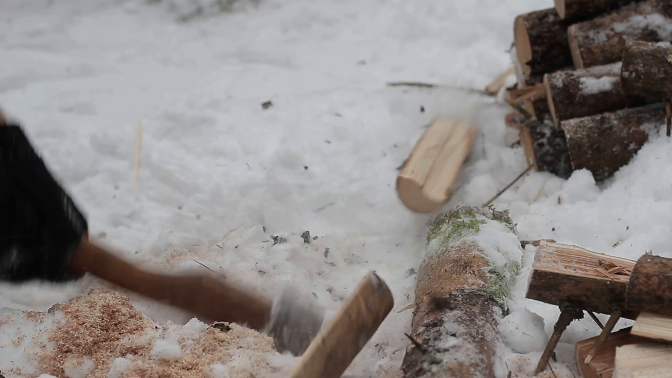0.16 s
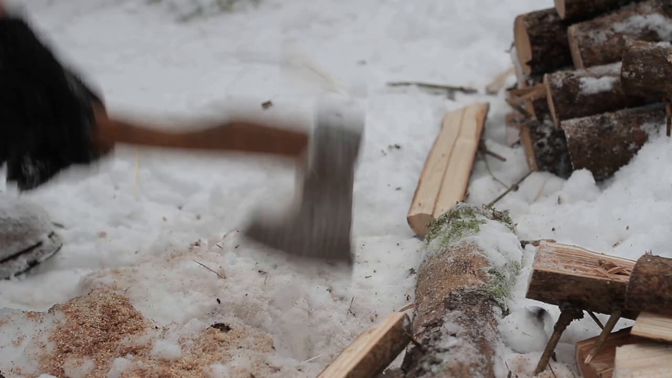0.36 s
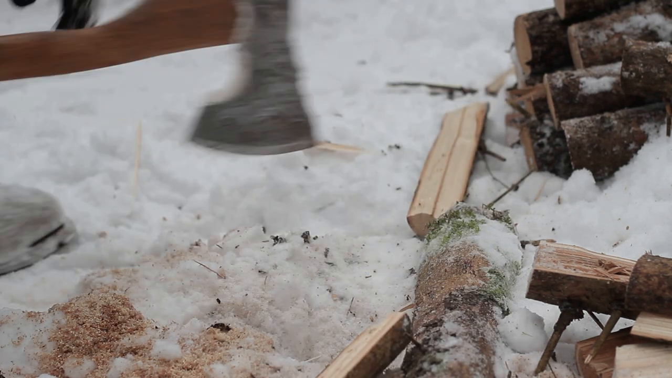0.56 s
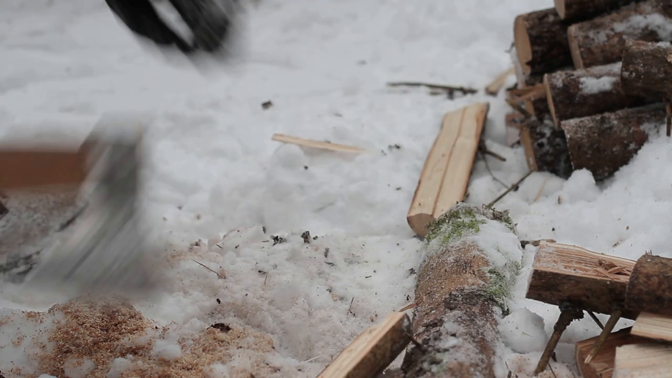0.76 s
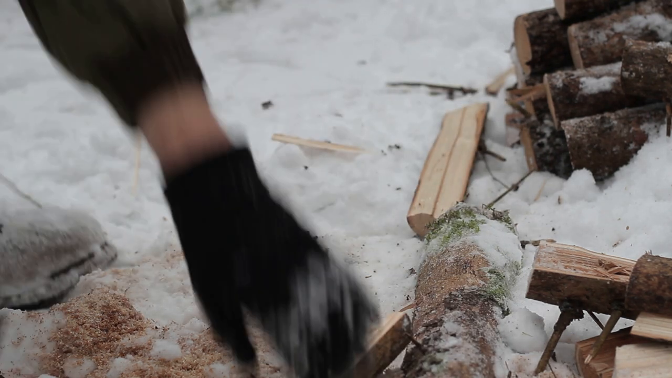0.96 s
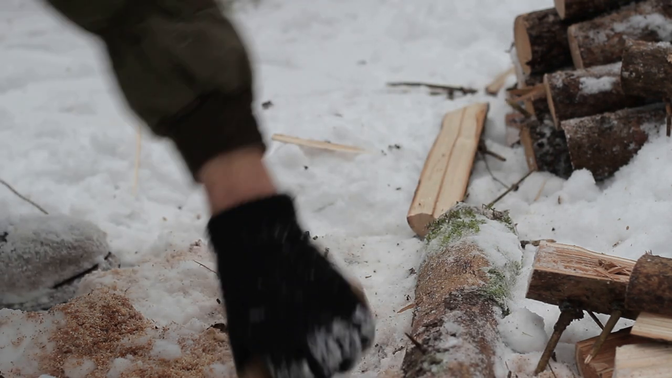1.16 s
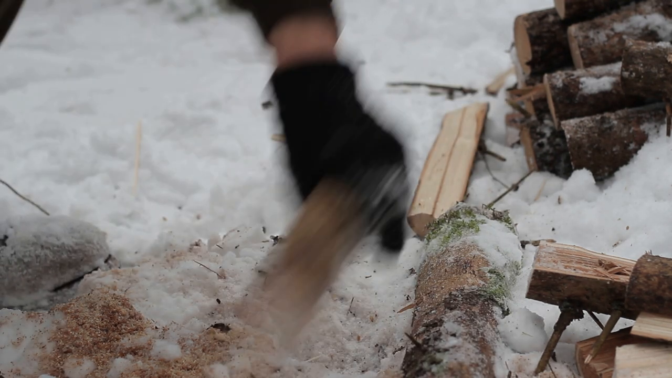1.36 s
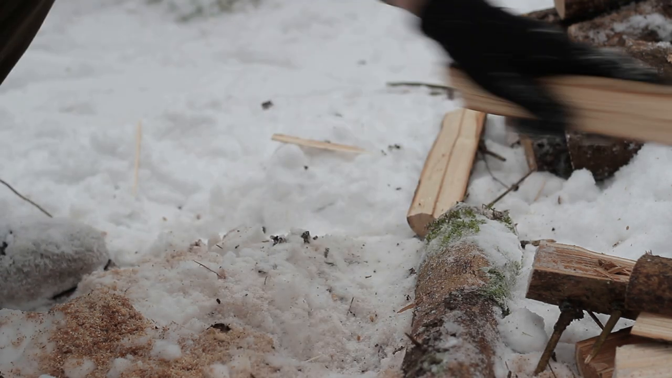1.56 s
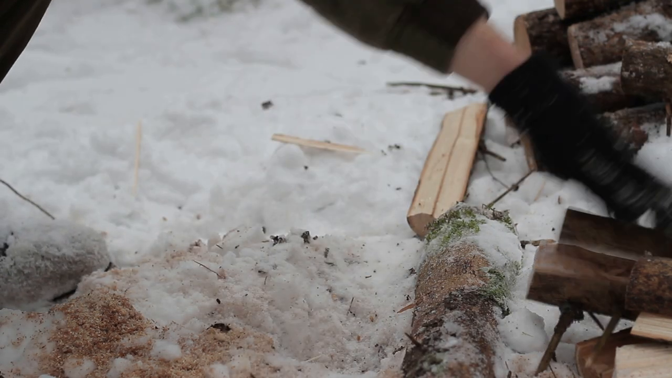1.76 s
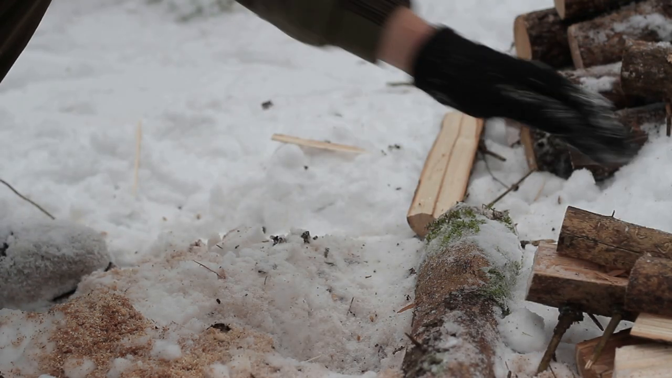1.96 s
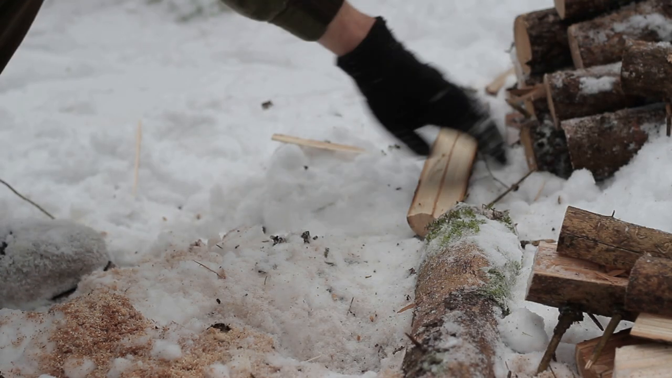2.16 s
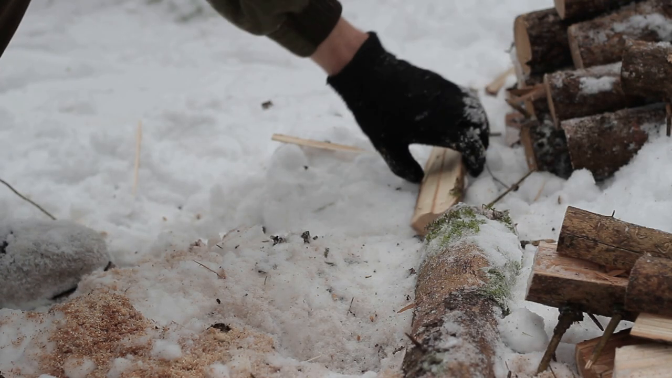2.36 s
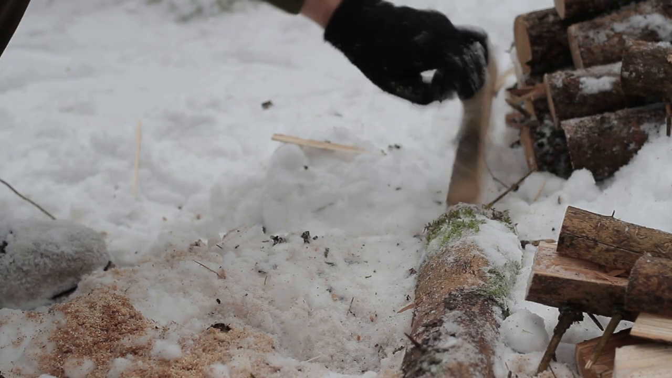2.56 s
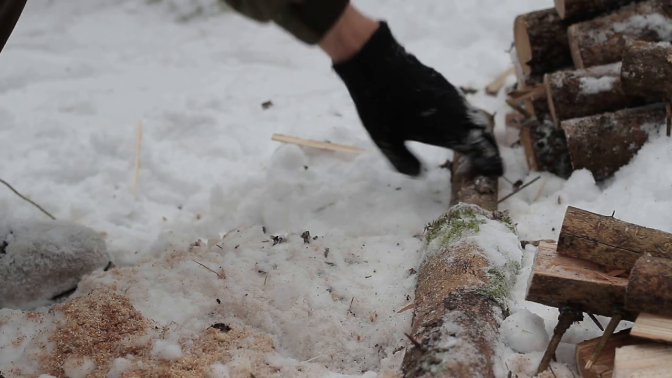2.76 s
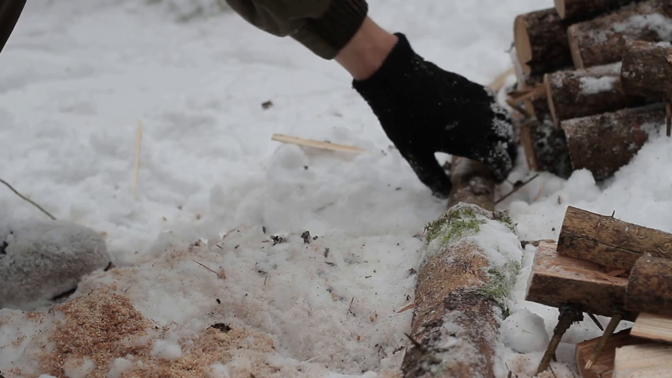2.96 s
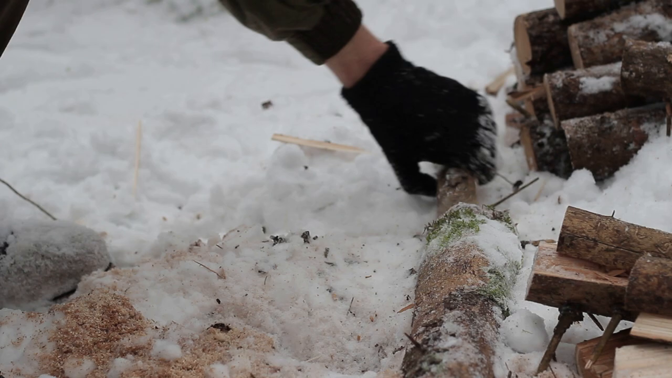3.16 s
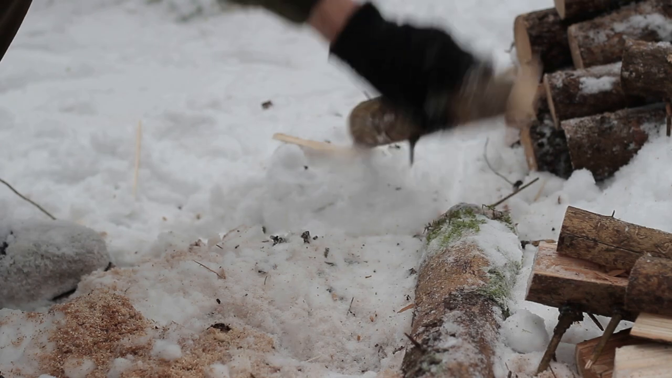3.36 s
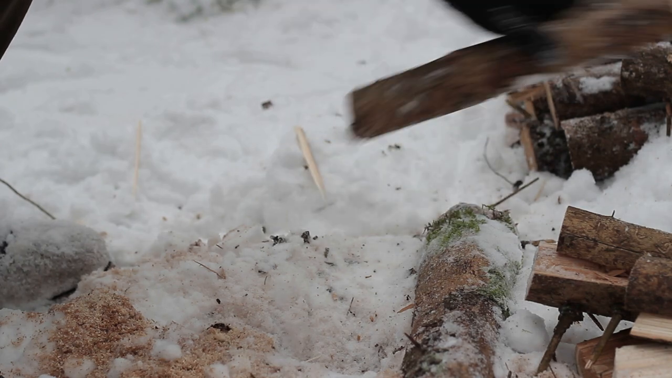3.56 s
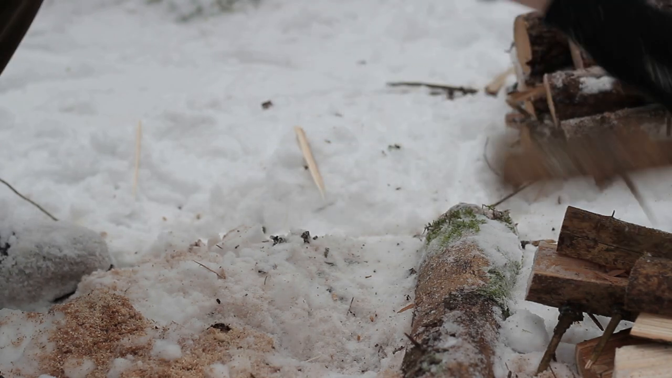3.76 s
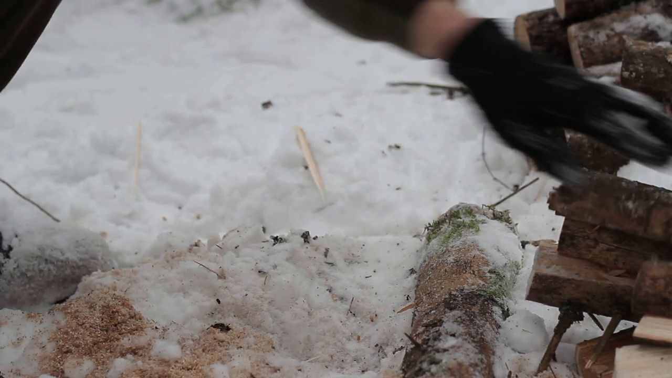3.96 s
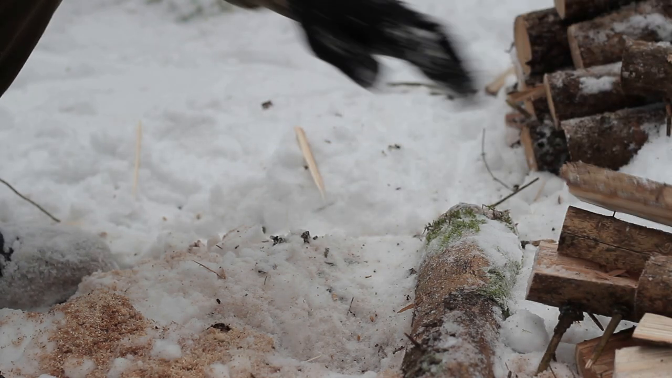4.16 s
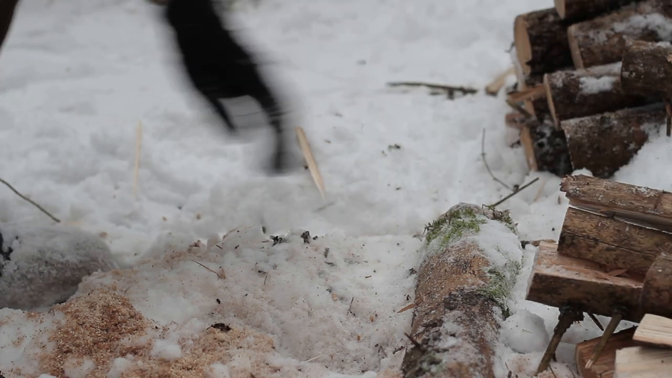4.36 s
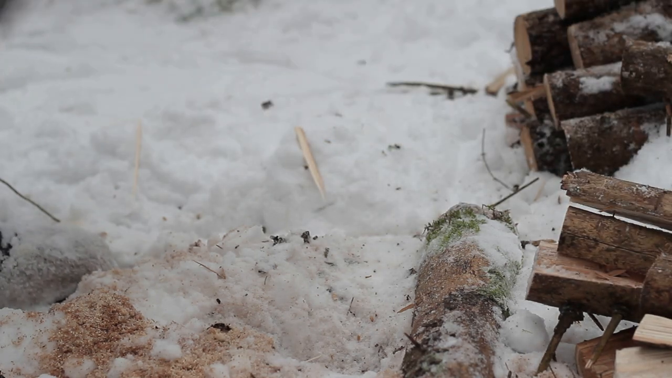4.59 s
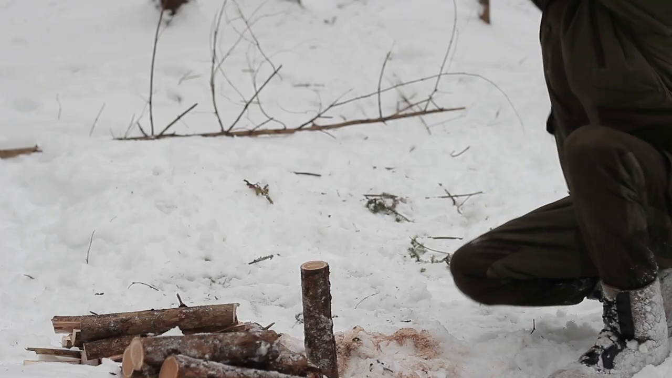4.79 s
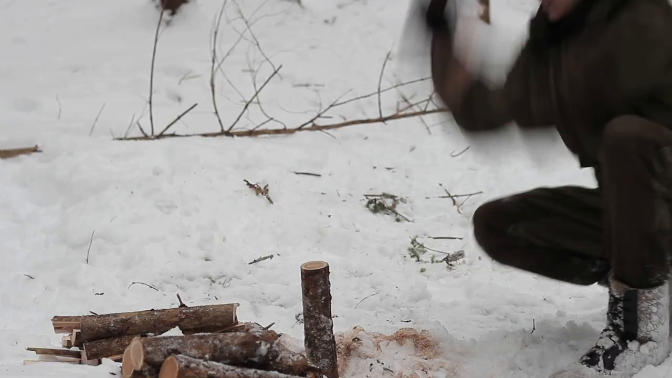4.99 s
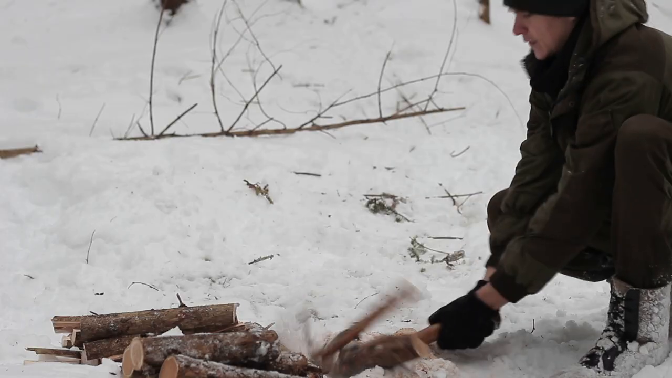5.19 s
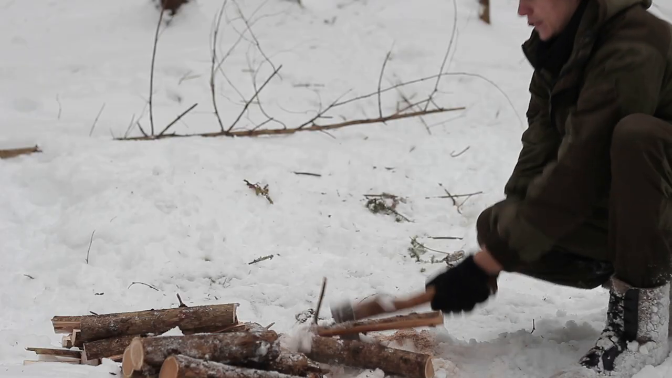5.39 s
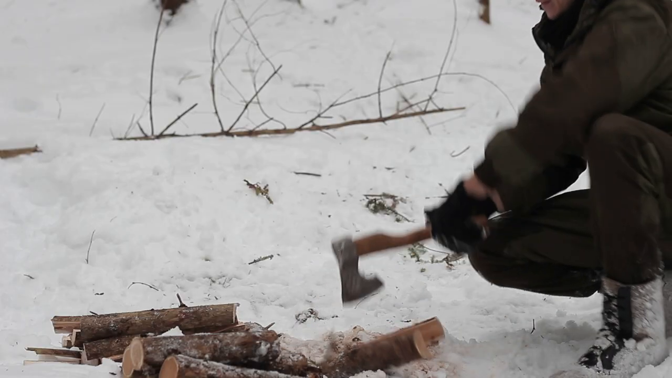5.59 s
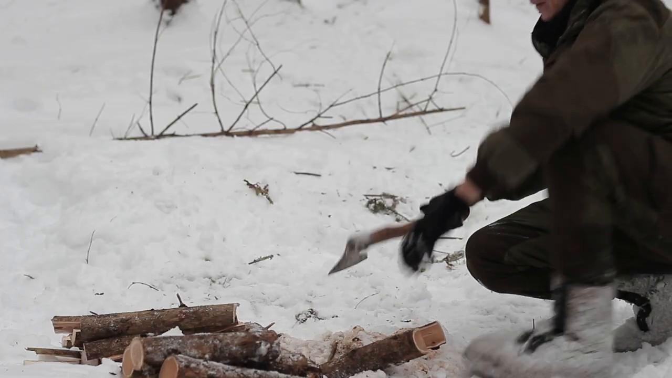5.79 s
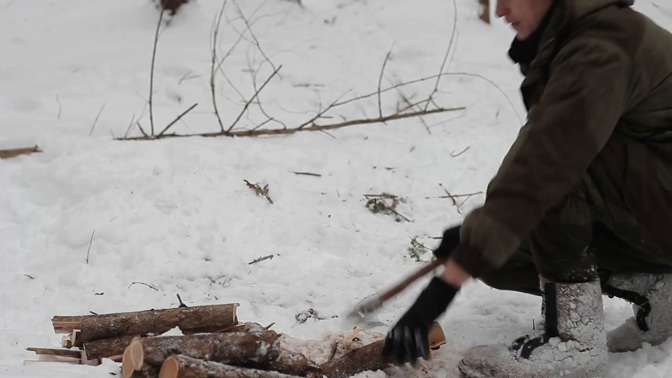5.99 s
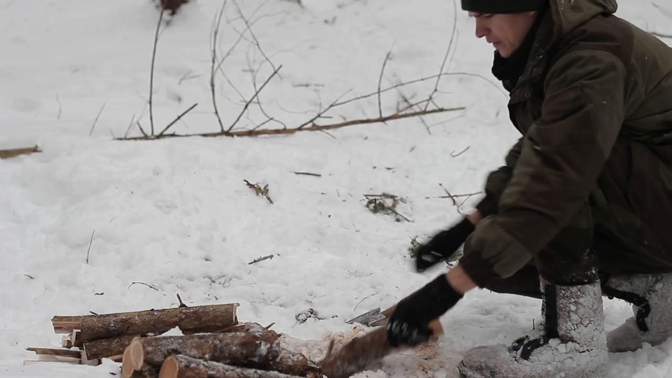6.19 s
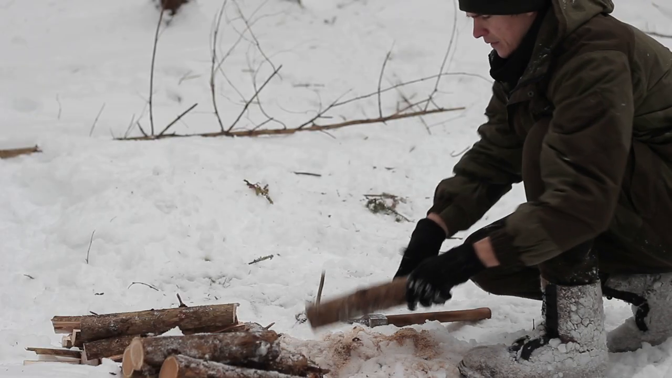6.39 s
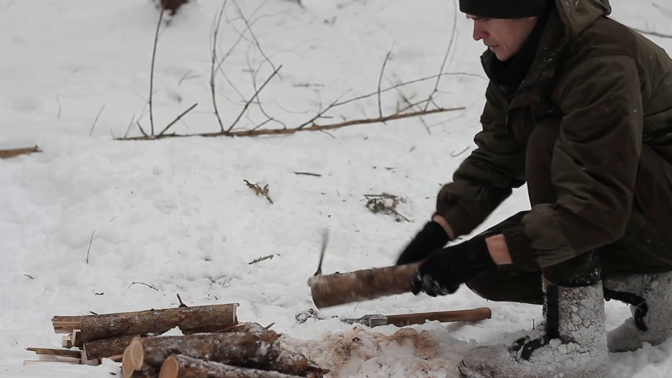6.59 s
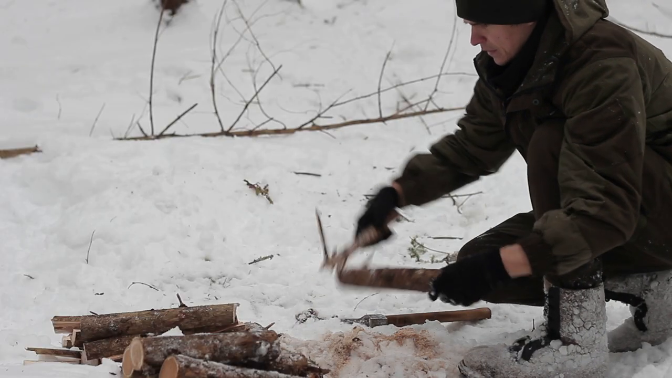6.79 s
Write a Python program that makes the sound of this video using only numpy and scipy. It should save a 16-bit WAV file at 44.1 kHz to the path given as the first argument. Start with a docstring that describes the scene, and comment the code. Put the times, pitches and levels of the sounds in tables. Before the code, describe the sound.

Sharp overloaded wood-splitting crack, faint glove rustle and ticks, two hollow log clacks, then another crack from farther back, with a short forest echo.

```python
"""A hatchet splits a small log almost at once, and another after 5 s, heard from farther off after a cut at 4.7 s,
in a snowy forest: each split is a volley of tearing fibres (resonant noise bursts) that shakes log and steel,
overloads the input and echoes off the trunks. Between the blows split logs knock on a pile (decaying modes),
gloves, bark and snow tick (noise bursts) and thud (low decaying sines), bark scrapes and splinters ping (slip noise
through resonances), and sleeves rustle over the murmur of the woods (filtered noise)."""
import sys
import numpy as np
from scipy import signal
from scipy.io import wavfile

SR = 44100
rng = np.random.default_rng(int(sys.argv[2]) if len(sys.argv) > 2 else 0)


def bounce(signal):
    """Save signal as a 16-bit WAV file at the path given by the first command-line argument."""
    frames = np.transpose(np.atleast_2d(signal))
    limited = np.clip(frames, -1, 1)
    pcm = np.round(limited * 32767).astype(np.int16)
    wavfile.write(sys.argv[1], SR, pcm)


N = 301644

# times the blade lands: [s]
BLOWS_S = [.032, 5.138]
# modes of a short dry log, the second its main ring: pitch_hz, level_db (relative), t60_s (before damping)
LOG_MODES = [(439, -8, 0.04), (990, -0.5, 0.1), (1310, -11, .04), (1430, -1.5, .045), (1710, -4.5, 0.069),
             (2020, -7.5, 0.059), (2230, -10, .035), (3250, -20.5, 0.06), (4080, -21, 0.027),
             (5630, -21.5, .015)]


def from_db(db):
    """Decibels to amplitude gain."""
    return 10 ** (np.asarray(db) / 20)


def rms_one(x):
    """Scales to rms 1."""
    return x / np.sqrt(np.mean(x ** 2) + 1e-20)


def at_hz(points, hz, axis=1):
    """A table column read on a log-frequency axis."""
    points = np.array(points)
    return np.interp(np.log(hz), np.log(points[:, 0]), points[:, axis])


def in_time(rows):
    """A level curve in dB as a gain at every sample."""
    s, db = np.transpose(rows)
    return from_db(np.interp(np.arange(N) / SR, s, db))


def drift(rate_hz):
    """Slow random curve of rms 1: noise through a two-pole lowpass, run at SR / 40."""
    r = np.exp(-80 * np.pi * rate_hz / SR)
    white = rng.standard_normal(N // 40 + 2002)
    slow = signal.lfilter([1], [1, -2 * r, r * r], white)[2000:]  # settled part
    return np.interp(np.arange(N) / 40, np.arange(len(slow)), rms_one(slow))


def bandpass(x, low_hz, high_hz):
    """Butterworth band-pass."""
    return signal.sosfilt(signal.butter(2, [low_hz, high_hz], "band", fs=SR, output="sos"), x)


def bands(white):
    """Half-octave slices of two noises dealt in turn, with their centres."""
    edges_hz = 30 * 2 ** np.arange(0, 9.6, .5)
    for k, (low, high) in enumerate(zip(edges_hz, edges_hz[1:])):
        yield np.sqrt(low * high), bandpass(white[k % 2], low, high)


def coloured(spectrum, white, patchy_db):
    """Noise with a spectrum, each band flickering partly on its own; rms 1."""
    together = drift(17.0)
    total = np.zeros(N)
    for hz, band in bands(white):
        flicker_db = patchy_db * (1.4 * together + drift(5.0))
        total += from_db(at_hz(spectrum, hz) + flicker_db) * band
    return rms_one(total)


def resonate(x, hz, width_hz):
    """One two-pole resonance, gain about 1 on top."""
    r = np.exp(-np.pi * width_hz / SR)
    zeros = np.array([1, 0, -1]) * (1 - r * r) / 2
    poles = [1, -2 * r * np.cos(2 * np.pi * hz / SR), r * r]
    return signal.lfilter(zeros, poles, x)


def add(track, s, sound):
    """Mixes a short sound in at time s."""
    i = round(s * SR)
    track[i:i + len(sound)] += sound[:len(track) - i]


def burst(fade_s, hz, sharpness, treble_db, rise_s):
    """A fading noise burst: a resonant body of peak 1 plus a bright edge."""
    t = np.arange(3000) / SR
    envelope = (1 - np.exp(-t / rise_s)) * np.exp(-t / max(fade_s, 2e-4))
    spray = rng.standard_normal((2, len(t))) * envelope
    width_hz = hz / np.clip(sharpness, .3, 30)
    body = resonate(spray[0], hz, width_hz)
    body = resonate(body, hz, 3.9 * width_hz)  # steepens the skirts
    edge = bandpass(spray[1], 4500, 16000)
    return body / np.abs(body).max() + from_db(treble_db) * edge / np.abs(edge).max()


def scatter():
    """Chips and snow spraying: a gain that starts at each blow and dies away."""
    # one start level per blow: [dB]
    scatter_db = [-42, -40.5]
    fade_db_per_s = 90
    t = np.arange(N) / SR
    return sum((t > s) * from_db(db - fade_db_per_s * np.abs(t - s)) for s, db in zip(BLOWS_S, scatter_db))


def background():
    """Murmur and self-noise are smooth noise; cloth and flying chips come in fine grains."""
    # relative spectra of the woods, the sleeves with the chips, and the self-noise: pitch_hz, level_db
    murmur_spectrum = [(24, -56), (40, -25.5), (166, -4.5), (519, 4), (1080, 4.5), (1310, -5), (2830, -10),
                       (3430, -8.5), (4000, -12), (5200, -41), (8800, -120)]
    rustle_spectrum = [(710, -31), (1200, -2.5), (1430, 6.5), (2040, -4.5), (3320, -1), (5900, -5),
                       (15200, -27.5), (16000, -15)]
    hiss_spectrum = [(18, -54), (30, -23), (158, -18.5), (190, -8), (506, -3), (1840, -15), (2400, -5.5),
                     (3210, -16.5), (15200, -18.5), (16500, -21)]
    # murmur level, which drops at the cut to a second, farther viewpoint at 4.7 s: time_s, level_db
    murmur_level = [(0, -50), (.4, -56.5), (.7, -52), (1.2, -56), (3.6, -59), (4.05, -54.5), (4.66, -58),
                    (4.71, -70.5), (5.0, -66), (5.5, -62), (6.84, -71)]
    # sleeve rustle level: time_s, level_db
    rustle_level = [(0, -55.5), (.28, -61.5), (.53, -54.5), (1.18, -57), (1.64, -60), (2.0, -57.5),
                    (2.2, -62), (3.07, -64), (3.29, -54.5), (3.54, -63.5), (4.04, -54.5), (4.5, -51.5),
                    (4.69, -61), (4.95, -69), (5.12, -61), (5.6, -59), (6.13, -65), (6.84, -65.5)]
    hiss_db = -63.5
    grains = rng.standard_normal((2, N)) * from_db(2.4 * np.minimum(rng.exponential(1, N), 6))
    murmur = coloured(murmur_spectrum, rng.standard_normal((2, N)), patchy_db=.6)
    rustle = coloured(rustle_spectrum, grains, patchy_db=1.4)
    hiss = coloured(hiss_spectrum, rng.standard_normal((2, N)), patchy_db=.7)
    cloth_and_chips = (in_time(rustle_level) + scatter()) * rustle
    return in_time(murmur_level) * murmur + cloth_and_chips + from_db(hiss_db) * hiss


def ticks():
    """Small dry contacts as noise bursts: the clear ones, then faint ones at random."""
    # bark, splinters, ice crust and gloves: start_s, level_db, colour_hz
    clear = [(.015, -46, 6350), (0.148, -33, 5440), (.183, -39, 5500), (0.303, -34, 2200),
             (0.4661, -25.5, 8400), (0.481, -30.5, 5000), (.512, -40, 1660), (.548, -34.5, 2600),
             (1.02, -42, 940), (1.132, -37, 1660), (1.209, -44, 2140), (1.283, -38.5, 3230),
             (1.706, -42, 6030), (1.988, -36.5, 1240), (2.066, -34.5, 3260), (2.126, -19, 12100),
             (2.125, -27.5, 2650), (2.477, -34.5, 5000), (2.651, -45.5, 6030), (2.706, -39, 2270),
             (2.744, -31.5, 7380), (3.045, -44.5, 4000), (3.162, -42.5, 2350), (3.240, -41, 2300),
             (3.266, -46, 2350), (3.296, -37.5, 2450), (3.342, -43, 5000), (3.418, -30.5, 8500),
             (3.510, -37, 7560), (3.631, -47.5, 1353), (3.753, -43.5, 4270), (3.787, -43, 6700),
             (3.867, -28, 5540), (3.872, -30, 4600), (3.886, -34, 8600), (3.905, -25, 5200),
             (3.92, -33, 5340), (3.939, -29.5, 3900), (3.951, -37.5, 5600), (3.971, -41, 8000),
             (4.030, -45, 10100), (4.198, -21, 4850), (4.2373, -26.5, 5460), (4.344, -38, 4630),
             (4.5202, -31.5, 5130), (5.352, -31.5, 3100), (5.441, -43.5, 7900), (5.517, -30, 3300),
             (5.525, -36, 4470), (5.695, -42.5, 1780), (5.909, -47, 8015), (6.122, -35, 3400),
             (6.18, -45.5, 1953), (6.376, -38.5, 1978), (6.514, -44.5, 3730), (6.527, -41, 5400),
             (6.544, -36, 6350), (6.560, -35.5, 8750), (6.644, -44, 3270)]
    faint_count, faint_floor_db = 14, -52.5
    fade_s, fade_at_hz, treble_db = .002, 2500, -17
    sharp_hz, sharpest = 9100, 3  # sharpness is sharp_hz over the colour, capped
    out = np.zeros(N)
    chance = rng.random((faint_count, 3))
    faint = [(N / SR * a, faint_floor_db + 6 * b, 1500 * 2 ** (2.2 * c)) for a, b, c in chance]
    for s, level_db, hz in clear + faint:
        this_fade_s = fade_s * np.sqrt(fade_at_hz / hz)  # brighter is shorter
        sharpness = min(sharp_hz / hz, sharpest)
        add(out, s, from_db(level_db) * burst(this_fade_s, hz, sharpness, treble_db, rise_s=0.0004))
    return out


def tears():
    """Fibres tearing as the blade goes through: coloured bursts, shorter as the split runs on."""
    # start_s, level_db, colour_hz
    fibres = [(.032, 10, 1502), (.036, -5.5, 487), (.038, 3.5, 1180), (0.044, 0, 2094), (0.05, -3, 2800),
              (0.057, -9, 3860), (.059, 2.5, 1770), (.063, -5, 890), (0.0671, -1, 1200), (.068, -5.5, 415),
              (0.072, -5, 893), (.074, -6.5, 1640), (0.079, -6.5, 895), (5.138, 3, 1507),
              (5.139, -6.5, 768), (5.141, -4.5, 3300), (5.144, -3, 2003), (5.147, -0.5, 1870),
              (5.150, -12, 398), (5.153, 3, 2050), (5.16, -1, 1700), (5.164, -13, 650), (5.167, -1, 1386),
              (5.166, -12, 3200), (5.182, -16, 1550), (5.184, -13, 1540)]
    first_fade_s, last_fade_s, shortening_s = 0.0064, 0.0012, 0.017
    treble_db = -12
    out = np.zeros(N)
    for s, level_db, hz in fibres:
        since_s = min(abs(s - blow) for blow in BLOWS_S)
        fade_s = last_fade_s + (first_fade_s - last_fade_s) * np.exp(-since_s / shortening_s)
        add(out, s, from_db(level_db) * burst(fade_s, hz, 1.9, treble_db, rise_s=0.0001))
    return out


def shaken(force):
    """The tearing drives the modes of the log and of the steel head."""
    # modes of the steel head: pitch_hz, width_hz, level_db (relative)
    head_modes = [(3190, 35, -7), (3860, 130, 2.5), (5220, 160, 6), (6060, 730, 5), (8800, 42, -3)]
    log = sum(from_db(db - 10.0) * resonate(force, hz, 10.0 / t60) for hz, db, t60 in LOG_MODES)
    head = sum(from_db(db + 3.0) * resonate(force, hz, width_hz) for hz, width_hz, db in head_modes)
    return log + head


def forest(x):
    """Many scattered returns off the trunks, dying at a rate of their own in each band."""
    # echo by band: pitch_hz, level_db (relative), t60_s
    trunks = [(300, -52, 0.24), (600, -39, 0.19), (1000, -46, 0.47), (1720, -54, 0.78), (2500, -52.5, 0.88),
              (3970, -46, 0.55), (7000, -44.5, 0.42), (12000, -47, 0.31)]
    t = np.arange(SR) / SR
    returns = rng.standard_normal((2, SR)) * from_db(2.5 * np.minimum(rng.exponential(1, SR), 6) - 4)
    echo = np.zeros(SR)
    for hz, band in bands(returns):
        decay_db = 60 * t / at_hz(trunks, hz, axis=2)
        echo += from_db(at_hz(trunks, hz) - decay_db) * band
    return signal.fftconvolve(x, echo * np.clip(t / .012, 0, 1))[:N]


def thuds():
    """Soft pushes in the snow: a low ring that swells for milliseconds and dies within some cycles."""
    # start_s, level_db (before swell and decay), pitch_hz
    pushes = [(0.041, -38, 200), (.065, -21, 300), (0.14, -29, 203), (0.531, -40.5, 270),
              (0.95, -39.5, 202), (1.128, -38.5, 200), (1.515, -36, 282), (1.579, -35, 260),
              (1.719, -39, 218), (1.827, -44, 183), (2.475, -37.5, 236), (3.786, -41.5, 246.5),
              (3.866, -24.5, 216), (3.898, -28.5, 255), (4.074, -37.5, 248), (4.188, -34, 248),
              (4.265, -39, 187), (5.140, -31, 256.7), (5.162, -34, 85)]
    cycles_to_60_db = 6.7
    out, t = np.zeros(N), np.arange(SR // 5) / SR
    for s, level_db, hz in pushes:
        envelope = from_db(level_db - 60 * t * hz / cycles_to_60_db) * (1 - np.exp(-t / .002))
        add(out, s, envelope * np.sin(2 * np.pi * hz * t))
    return out


def scrapes():
    """Bark scrapes and short splinter pings: uneven slips drive a narrow squeak and a broad grit."""
    # start_s, length_s, squeak_db, squeak_hz, grit_db
    drags_and_pings = [(0.083, 0.17, -48, 1075, -51.5), (.142, .012, -41, 5700, -48),
                       (0.181, 0.012, -34.5, 5500, -55), (0.201, 0.032, -48, 3150, -43),
                       (1.122, 0.056, -49, 1636, -58), (1.23, .05, -65, 5320, -68),
                       (1.336, 0.16, -67.5, 5350, -68), (1.376, .04, -59.5, 2180, -66),
                       (1.97, 0.072, -64, 6060, -55), (2.028, 0.14, -63, 3650, -58),
                       (2.639, 0.04, -54.5, 2350, -59), (2.704, 0.06, -52.5, 2300, -47),
                       (2.733, 0.026, -48.5, 3330, -52), (3.158, .09, -58, 2320, -73),
                       (3.234, 0.12, -56, 2350, -57.5), (3.406, 0.034, -51, 1750, -51.5),
                       (3.776, .028, -50, 1970, -47), (3.877, 0.023, -48, 4620, -47),
                       (4.196, 0.13, -60, 2200, -55.5), (4.465, 0.1, -78, 1490, -52),
                       (5.512, 0.026, -46, 3280, -49), (5.846, .05, -60.5, 1797, -66),
                       (6.109, .025, -55, 1692, -63), (6.361, 0.044, -53, 1964, -67.5),
                       (6.631, 0.033, -57.5, 3330, -69.5)]
    rise_share, fall_share, grit_hz = 0.23, 0.37, 5500  # shares of the length
    stick_s, stick_db = .006, 4  # the stroke catches and lets go
    out, t = np.zeros(N), np.arange(SR // 2) / SR
    for s, length_s, squeak_db, squeak_hz, grit_db in drags_and_pings:
        slips = rng.standard_normal((2, len(t))) * from_db(5 * np.minimum(rng.exponential(1, len(t)), 5))
        squeak = rms_one(resonate(resonate(slips[0], squeak_hz, 110), squeak_hz, 250))
        grit = rms_one(resonate(resonate(slips[1], grit_hz, grit_hz * 0.39), grit_hz, grit_hz * 1.3))
        catches = from_db(stick_db * np.interp(t / stick_s, np.arange(100), rng.standard_normal(100)))
        ramps = np.minimum(t / rise_share, (length_s - t) / fall_share)
        stroke = np.clip(ramps / length_s, 0, 1)
        add(out, s, stroke * catches * (from_db(squeak_db) * squeak + from_db(grit_db) * grit))
    return out


def knocks():
    """Log on log: a few broad cycles and splintering, then the log's modes ring, struck unevenly."""
    # start_s, ring_db, main_ring_hz, damping (factor), crack_db, crack_hz
    hits = [(.141, -50, 1030, 1.5, -55, 500), (1.8190, -21.5, 964, 1.06, -13, 4400),
            (1.8255, -15.5, 922, 4.1, -25, 1180), (1.8277, -15, 985, 3.9, -4.5, 1790),
            (1.833, -17, 962, 1.74, -19.5, 1712), (2.476, -36, 887, 2.5, -33, 1600),
            (2.651, -40.5, 1037, 1.4, -32, 1610), (2.742, -43, 1044, 1.4, -48, 1716),
            (3.318, -35, 970, 3.1, -29.5, 1410), (3.324, -40, 1044, 1.5, -40, 1480),
            (3.408, -43, 1030, 0.89, -30, 1850), (3.787, -36.5, 520, 2.1, -31.5, 4050),
            (3.868, -19.5, 989, 1.54, -16.5, 1420), (3.891, -26.5, 620, 2.4, -24, 650),
            (3.8972, -20, 1030, 0.78, -6.5, 1690), (4.073, -53, 780, 5.3, -34, 780),
            (4.09, -33.5, 1010, 0.92, -24.5, 1830), (4.19, -41.5, 890, 0.94, -41, 480),
            (4.217, -41, 1310, 1.2, -44, 1200)]
    splinter_db, treble_db = -2, -26.5  # against the crack; its bright edge
    out, t = np.zeros(N), np.arange(SR // 4) / SR
    for s, ring_db, ring_hz, damping, crack_db, crack_hz in hits:
        uneven_db = rng.normal(0, 2.0, len(LOG_MODES))
        scale = ring_hz / LOG_MODES[1][0]
        ring = np.zeros(len(t))
        for k, ((hz, db, t60), u) in enumerate(zip(LOG_MODES, uneven_db)):
            decay = from_db(db + u - 60 * t * damping / t60)
            ring += decay * np.sin(2 * np.pi * hz * scale * t) * (-1) ** k
        ring *= 1 - np.exp(-t / 0.0001)
        cycles = t * crack_hz
        clack = np.sin(2 * np.pi * cycles) * cycles / 1.05 * np.exp(1 - cycles / 1.09)
        splinters = burst(0.0018, crack_hz, 1.7, treble_db, rise_s=0.0001)
        add(out, s, from_db(ring_db) * ring + from_db(crack_db) * clack)
        add(out, s, from_db(crack_db + splinter_db) * splinters)
    return out


def scene():
    """Cracks and knocks echo; the small sounds are too faint to."""
    near_db, far_db, knock_db, cut_s = -6.5, -0.5, -8.5, 4.7  # echo sends; start of the farther viewpoint
    cracks, logs = tears(), knocks()
    crack_send_db = np.where(np.arange(N) / SR < cut_s, near_db, far_db)
    sent = cracks * from_db(crack_send_db) + logs * from_db(knock_db)
    loud = cracks + shaken(cracks) + logs + forest(sent)
    return (loud + ticks() + scrapes() + thuds() + background())[None]


def record(dry):
    """The bass is cut, the input stage flattens the loudest peaks, then bottom and top are cut."""
    bass_cut_hz, coupling_hz, cutoff_hz = 120, 90, 17050
    overload, offset = .6, .001  # amplitude; constant added last
    thin = signal.sosfilt(signal.butter(1, bass_cut_hz, "high", fs=SR, output="sos"), dry)
    flat = thin / (1 + np.abs(thin / overload) ** 5.0) ** (1 / 5.0)
    flat = signal.sosfilt(signal.butter(1, coupling_hz, "high", fs=SR, output="sos"), flat)
    return signal.sosfilt(signal.cheby2(12, 70, cutoff_hz, fs=SR, output="sos"), flat) + offset


dry = scene()
out = record(dry)
bounce(out)
```